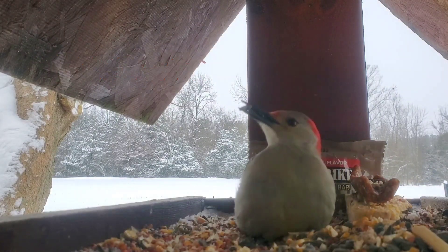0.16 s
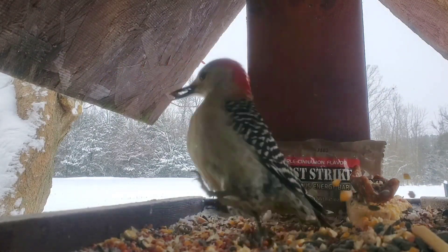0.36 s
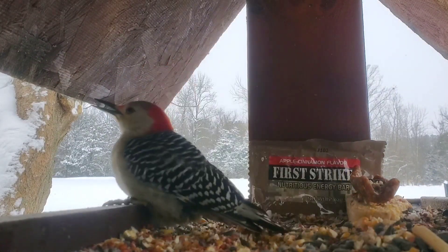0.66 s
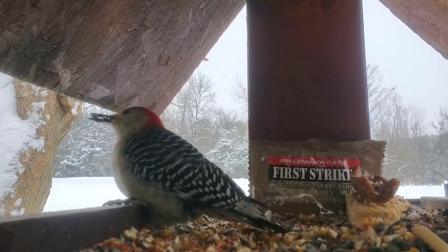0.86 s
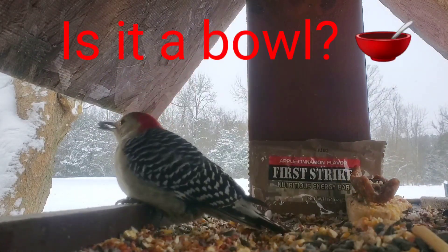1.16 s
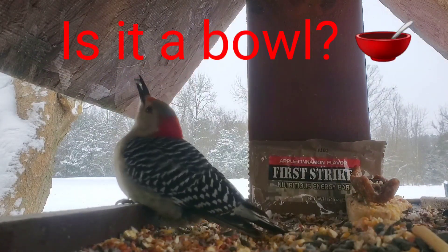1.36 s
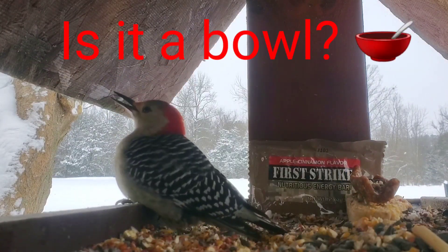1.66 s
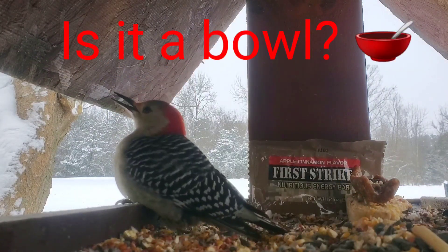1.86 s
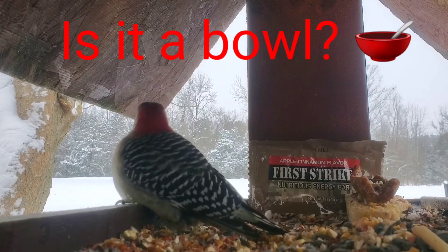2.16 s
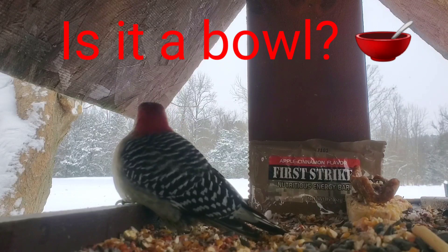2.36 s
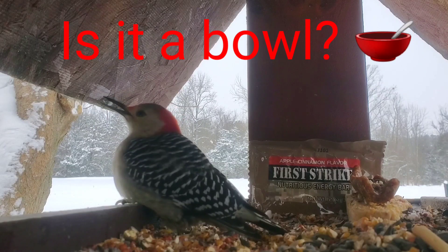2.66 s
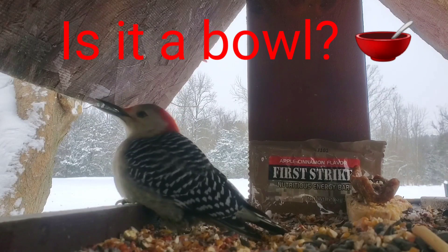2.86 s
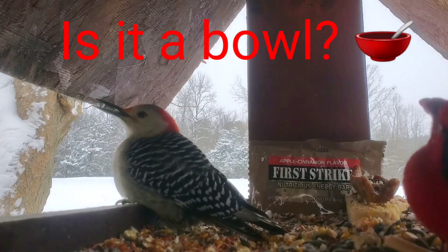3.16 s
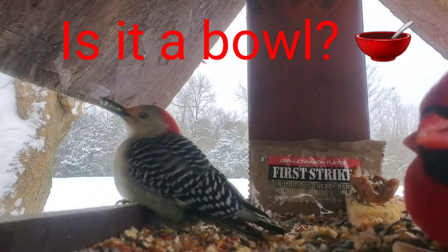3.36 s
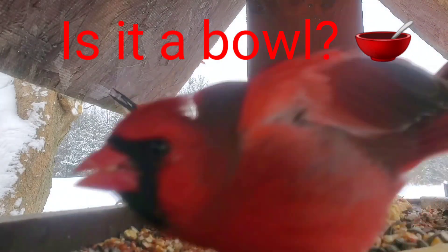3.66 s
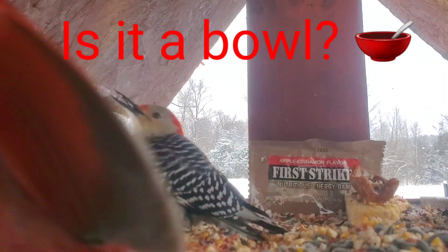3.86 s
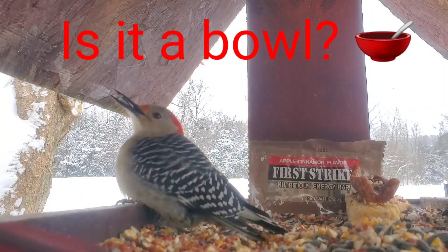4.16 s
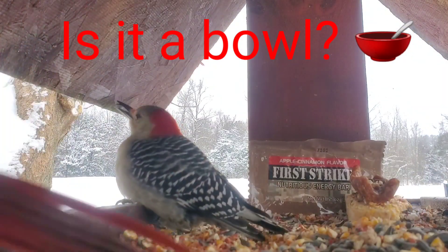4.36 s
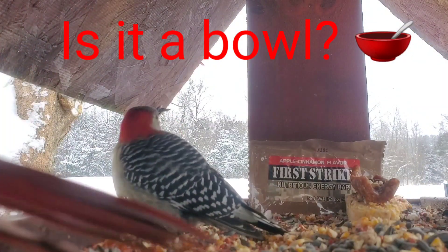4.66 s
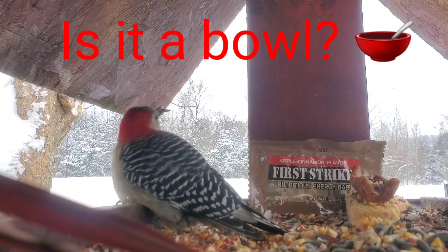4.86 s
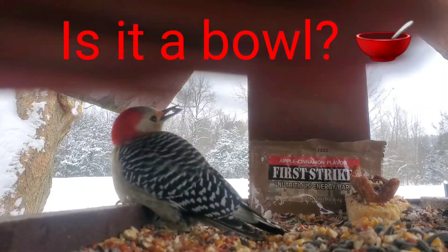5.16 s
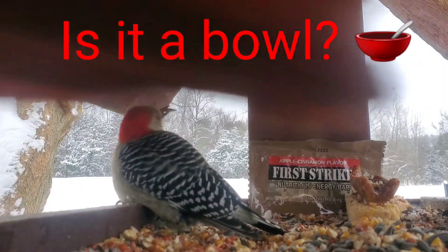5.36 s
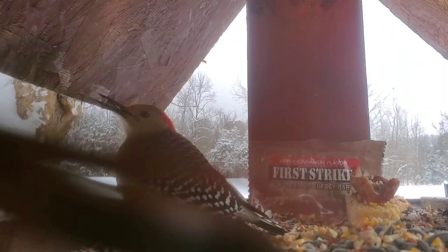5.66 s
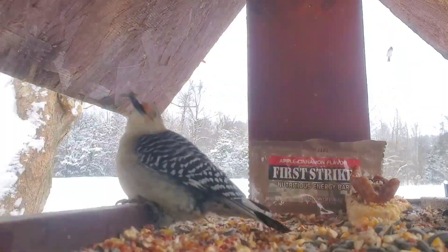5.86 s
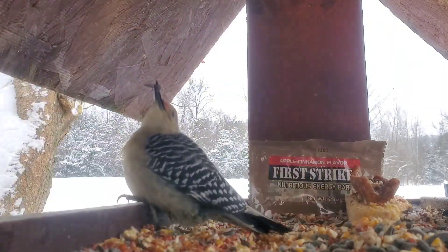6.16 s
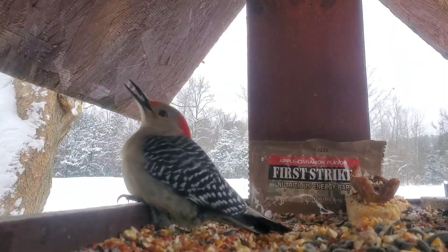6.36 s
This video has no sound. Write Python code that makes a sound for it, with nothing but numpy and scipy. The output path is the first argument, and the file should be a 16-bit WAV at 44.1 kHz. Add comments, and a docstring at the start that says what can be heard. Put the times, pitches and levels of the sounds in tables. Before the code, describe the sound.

Birds shuffle on a wooden feeder tray right against the microphone: feather swishes, small knocks, seed clicks, low throbbing buffets and two brief stuttering foot squeaks.

```python
"""On a wooden feeder tray, on a still winter day, birds shuffle about right against a small camera.
Sliding barbs swish by friction over the case; pressed air buffets the microphone ports in throbbing pushes.
Bumps, clicks and knocks are brief contact forces; struck or scraped, the case rings in its modes.
Twice a foot skids by stick and slip, with a rough, stuttering squeak; faint air and hiss lie behind."""
import sys
import numpy as np
from scipy import signal
from scipy.fft import rfft, irfft
from scipy.io import wavfile
from scipy.ndimage import uniform_filter1d

SR = 44100
rng = np.random.default_rng(int(sys.argv[2]) if len(sys.argv) > 2 else 0)


def wav_record(signal):
    """Record a signal, one row per channel, as 16-bit PCM in the file named by sys.argv[1]."""
    frames = np.transpose(np.atleast_2d(signal))
    bounded = np.clip(frames, -1, 1)
    # unit amplitude maps onto the largest positive 16-bit level
    quanta = np.round(bounded * 32767).astype(np.int16)
    wavfile.write(sys.argv[1], SR, quanta)


N = 287520
TIME = np.arange(N) / SR

# feathers sliding past: start_s, length_s, crest [share of length], level_db, low_edge_hz,
# fizz_over_swish_db, hollow_over_level_db, left_minus_right_db
SWISHES = [(0.0, 0.028, 0.21, -47, 1700, -11, -1, 7), (0.252, 0.18, .9, -61, 1850, -4, 6.5, 3.5),
           (0.382, 0.18, .6, -50, 1800, 6, -3, 2), (0.532, 0.095, .35, -48.5, 1720, -3, 3, 4),
           (0.784, 0.21, .6, -65, 1760, -51, 10.5, 4.5), (0.939, 0.25, .7, -54, 1940, -8, 0, 2.5),
           (1.202, 0.17, .45, -49, 1980, -18, 3.5, 3), (1.412, 0.15, .45, -60, 1320, -8, 12.5, 2),
           (1.61, 0.15, .6, -69.5, 2000, 2, 5.5, 7), (1.752, 0.11, .5, -61.5, 2120, 5, 2.5, 6),
           (1.955, 0.28, .45, -56.5, 1860, 3, 4, 3), (2.304, 0.26, .5, -54.5, 1850, 0.5, -2, 2.5),
           (2.554, 0.18, .7, -46.5, 1850, -4.5, -6, 1.5), (2.742, 0.07, .6, -44.5, 1670, 0, -0.5, 5),
           (2.819, 0.1, .4, -32.5, 2060, -4.5, -5, 0), (2.906, 0.27, 0.064, -52.5, 2000, -7, -3, 1.5),
           (3.153, 0.068, 0.31, -33.5, 1875, 0, -9.5, 2), (3.417, 0.031, .5, -37, 2000, 3.5, -18.5, 2.5),
           (3.464, 0.081, .8, -46, 2600, 0.5, -6.5, 2.5), (3.599, 0.14, .9, -38.5, 1730, -4, -16.5, 2.5),
           (3.743, 0.088, .3, -32.5, 1818, 5, -2, 5), (3.855, 0.18, .35, -36, 2150, 3, -6.5, 3),
           (4.028, 0.044, .75, -30.5, 1935, -3, -1, 9), (4.09, 0.13, .4, -50, 1820, -7, -6.5, 5),
           (4.408, 0.1, .8, -55.5, 2100, 3, -9, 7.5), (4.556, 0.057, .8, -63, 2320, 11, -6, 10),
           (5.155, 0.15, .65, -61.5, 2000, 4, 0.5, 8), (5.497, 0.19, .4, -64.5, 2940, -1, -4.5, 10.5),
           (5.786, 0.27, .8, -65, 2000, 3, 2.5, 7), (5.99, 0.23, .35, -59, 2200, -2, 2.5, 2.5),
           (6.272, 0.17, .3, -76.5, 1680, -4, 19, 2)]
# a movement starts quickly, arches to its crest and dies away: attack_s, ends_below_crest_db, release_s
SWISH_SHAPE = (0.021, 12.5, .02)
PUSH_SHAPE = (0.048, 9, 0.015)  # same columns
# a bird pressing air onto the ports: start_s, length_s, crest [share of length],
# level_db [before the throb], left_minus_right_db
PUSHES = [(0.005, 0.061, .5, -68, -9), (0.252, 0.14, .8, -58.5, -30), (0.412, .21, .3, -80.5, 6),
          (0.773, 0.64, 1, -46, 0), (1.427, 0.16, 0.6, -48.5, 0.5), (1.633, 0.23, .865, -50, 1.5),
          (1.953, 0.26, 0.65, -39, 2.5), (2.316, 0.2, 0.61, -32, 5), (2.551, 0.15, 0.84, -20.5, 6.5),
          (2.706, 0.26, .6, -43.5, 9.5), (3.258, 0.047, .6, -40, 7), (3.394, 0.18, .5, -65.5, 1),
          (3.694, 0.12, .5, -38.5, 13), (3.846, 0.23, .35, -31, 3.5), (4.028, 0.27, .1, -41.5, 3),
          (4.296, 0.086, 1, -46, -12), (4.75, 0.31, .3, -68, -1), (5.231, 0.043, 0.72, -30, 24.5),
          (5.499, 0.29, .5, -55, 2), (5.981, 0.26, .4, -49.5, 4), (6.172, 0.03, .6, -30.5, -26),
          (6.283, 0.25, .6, -51.5, -4)]
# faint fidgeting between movements, with one still moment: time_s, level_db
FIDGET = [(0, -72), (1.2, -72.5), (1.9, -76), (2.9, -69), (4.3, -65.5), (4.72, -82.5), (5.0, -85),
          (5.12, -75.5), (5.4, -78), (6.5, -73)]
# soft bumps of a bird's body: time_s, relative_level_db
BUMPS = [(0.922, -39), (0.955, -33.5), (1.047, -40), (1.3, -31), (1.347, -36), (1.457, -36), (1.51, -31.5),
         (1.693, -35), (1.816, -30.5), (2.004, -29), (2.061, -29.5), (2.117, -30), (2.184, -27),
         (2.376, -27.5), (2.437, -28), (2.622, -26.5), (2.656, -27), (2.672, -28.5), (3.734, -41.5),
         (3.912, -20), (3.973, -22.5), (4.022, -31), (4.139, -56), (4.214, -49), (5.688, -48),
         (6.064, -35.5), (6.108, -43), (6.163, -47), (6.341, -43.5), (6.387, -38.5), (6.427, -45),
         (6.47, -41.5)]
# claws and bills on seed, wood and case: start_s, level_db, contact_s,
# brightness_db [3.5 above the tilt applied from 8 kHz up], left_minus_right_db
CLICKS = [(0.0208, -37.5, 0.0028, -2.5, 1), (0.2372, -44.5, 0.0032, 3.5, 6), (0.269, -46.5, 0.0026, 5, -3),
          (0.475, -35.5, 0.0018, 24, 1), (0.498, -34.5, 0.001, 31, 7), (0.5595, -33, 0.0014, -6.5, 0),
          (0.5753, -32, 0.0014, 21, 1), (0.5997, -42, 0.0057, 11, 1), (0.9517, -45, 0.0029, -12, 2),
          (1.4659, -48, .0024, 12, 11), (1.4794, -46, 0.0074, -4.5, 4), (2.039, -49, 0.0066, -22, 5),
          (2.335, -41, 0.0041, 12, 5), (2.383, -33, 0.0069, -3, 2), (2.4417, -39, 0.011, -3.5, 4.5),
          (2.739, -39.5, 0.011, -8.5, 5), (2.777, -34.5, 0.0031, -11.5, 1), (3.0012, -40, 0.0033, -17, 5.5),
          (3.021, -34, 0.0032, -2, -3), (3.0894, -37.5, 0.002, -16, -7), (3.26, -40, 0.0072, -5.5, 5.5),
          (3.2818, -24.5, 0.0028, 7, 11), (3.315, -41.5, 0.0036, -12, 3.5),
          (3.6486, -41.5, 0.0012, -9, 19.5), (3.759, -26, .0069, 0.5, 4.5),
          (3.7879, -24, 0.0046, -10, 17.5), (3.8555, -31, .0039, -11.5, -1.5),
          (3.8723, -25, 0.0075, -2, 2.5), (3.918, -23, 0.0032, 0.5, 1), (3.945, -28.5, .0063, 19.5, 22),
          (3.9882, -27, 0.0042, 14.5, 5.5), (4.0197, -25.5, .005, 10, 13.5),
          (4.0343, -23.5, .0027, 12, 6.5), (4.0573, -26.5, 0.0059, -5.5, 10.5),
          (4.0914, -26, 0.0026, 21, 7.5), (4.1069, -38.5, 0.0012, 10, 12),
          (4.1223, -40.5, 0.0047, 10.5, 17.5), (4.181, -35, .0017, 8.5, 11.5),
          (4.2008, -30.5, 0.0044, -5.5, 7.5), (4.2458, -53.5, 0.0065, -8, 6), (4.3481, -45, 0.0012, 3, 13),
          (5.0426, -55, .0014, 9.5, 11), (5.216, -48, 0.0014, 5, 16), (5.2534, -47, 0.015, -3, 8),
          (5.8015, -54.5, 0.0029, 19, 14)]
# feet knocking on the case: start_s, level_db, nominal_hz [the ring sags from 0.99 to 0.86 of it]
KNOCKS = [(0.02, -37, 624), (0.213, -40, 630), (0.278, -48.5, 590), (0.318, -44.5, 610), (0.437, -42, 650),
          (0.551, -32, 670), (0.567, -37, 765), (1.097, -38, 925), (1.208, -43.5, 635), (1.449, -34.5, 970),
          (2.385, -34, 690), (2.774, -32, 710), (3.281, -38.5, 859), (3.317, -64, 790), (3.763, -27.5, 746),
          (3.789, -21.5, 793), (3.817, -26.5, 660), (3.855, -28, 657), (4.02, -36, 820), (4.063, -30, 800),
          (4.154, -36.5, 654), (4.201, -34, 753), (4.347, -44.5, 1030), (4.493, -34.5, 626),
          (5.252, -44.5, 695), (5.9, -54, 740), (6.005, -44.5, 690), (6.036, -40.5, 824)]
# the two skids of a foot, a curve each: time_s, relative_force_db, squeak_hz
SKID_CURVES = [
    [(2.813, -31.5, 800.4), (2.835, -32.5, 734.2), (2.845, -30.5, 738), (2.917, -35, 811),
     (2.951, -27, 832.6), (2.987, -37.5, 822.6), (3.02, -31, 820)],
    [(3.42, -32.5, 672), (3.534, -29, 681), (3.54, -34, 692)],
]
# short catches of the foot before and after a skid: time_s, force_db, squeak_hz
CATCHES = [(3.039, -33.5, 816.6), (3.05, -33, 649), (3.075, -38.5, 692), (3.09, -38, 780),
           (3.105, -43.5, 600), (3.401, -38.5, 718.8), (3.55, -32, 656.6), (3.567, -32, 666.4),
           (3.588, -36, 695)]
# upper modes of the case: frequency_hz, bandwidth_hz, relative_level_db
CASE_MODES = [(1040, 180, 12), (1164, 230, -1), (1860, 570, -10), (1975, 75, 8.5), (2124, 83, 6),
              (2495, 260, 2), (2880, 210, -13.5), (2700, 160, 0), (2990, 450, 1), (3486, 120, -6),
              (4700, 1400, -11.5)]

# relative spectra: frequency_hz, level_db
FEATHER_SPECTRUM = [(240, -34), (400, -10.5), (630, -4), (734, -4), (816, 13.5), (1390, 2.5), (1820, -4.5),
                    (2320, -5.5), (3290, -9), (4810, -15), (5430, -13.5), (7470, -9.5), (10100, -9),
                    (12300, -4), (15000, -5.5)]  # barbs sliding
HOLLOW_SPECTRUM = [(250, -1.5), (450, -5.0), (580, 2.5), (750, -1.5), (1080, -3.5), (1350, -19.5), (2000, -31.5)]
HEAVY_PUSH_SPECTRUM = [(11, -47), (18, -14), (43, -2), (58, 8.5), (70, -3), (85, -10), (113, -9.5),
                       (147, -20.5), (206, -12.5), (252, -18), (315, -34), (410, -24), (481, -44.5),
                       (600, -35.5), (780, -60), (1320, -120)]  # heavy pressure on the ports
LIGHT_PUSH_SPECTRUM = [(11, -38), (18, -17), (43, 5.5), (60, 11.5), (97, 2), (140, -2.5), (200, -2.5),
                       (265, -8), (320, -17.5), (420, -17.5), (600, -37.5), (800, -43.5), (1300, -96.5)]  # light brushing of the ports
CLICK_SPECTRUM = [(300, -6.5), (700, 2), (1400, -0.5), (2200, -3), (3500, 3), (5500, -0.5), (8000, 4),
                  (12000, 5), (15000, 6)]  # scratch of one contact
SKID_SPECTRUM = [(300, -14), (560, 5.5), (650, 0), (740, -7.5), (850, 3), (1000, 4), (1500, -12.5),
                 (2000, -8), (5000, -8)]  # squeaking tone
GRIT_SPECTRUM = [(500, -36), (900, 2.5), (2000, -26), (3500, 15.5), (5500, 11.5), (8000, 9), (11000, 8),
                 (15000, -13)]  # fine cracks under the foot
HUSH_SPECTRUM = [(12, -38.5), (20, -12), (45, -9), (66, -4), (82, -3), (135, -26), (278, -20), (377, -19.5),
                 (713, -22), (1080, -34), (1460, -31.5), (3010, -33.5), (6180, -38.5), (13800, -35.5),
                 (15000, -53.5)]  # open air and microphone hiss
BASS_ROLLOFF = [(10, -19), (25, -2.5), (42, -1)]
TREBLE_ROLLOFF = [(14600, 0), (15000, -14), (15600, -27), (16300, -33)]


def feathers(grain_db=-1.5, flutter_db=2.0, snaps_per_s=260, snap_db=-9, patch_db=3.0):
    """Dry friction: barbs slide and catch in a grainy swish over the hollow resonance of the case."""
    catch = amp(grain_db * wander(420) + flutter_db * wander(28))
    snap_sizes = amp(4.9 * np.minimum(rng.exponential(1, (2, N)), 3))
    snaps = (rng.random((2, N)) < snaps_per_s / SR) * snap_sizes * rng.choice([-1, 1], (2, N))
    barbs = colour(unit(pair(0) * catch) + amp(snap_db) * unit(snaps), FEATHER_SPECTRUM)
    fizz = unit(band(barbs, 4600, 14000))
    hollow = unit(colour(pair(0.35) * catch, HOLLOW_SPECTRUM))

    fidget_swish = amp(-7.5) * unit(band(barbs, 1900, 6000))
    out = amp(curves(FIDGET)[0]) * (fizz + fidget_swish + amp(1.5) * hollow)
    for start, length, crest, db, low_hz, fizz_db, hollow_db, side in SWISHES:
        gain = stroke(start, length, crest, *SWISH_SHAPE)
        span = np.flatnonzero(gain)
        swish_share = 1 / (1 + amp(fizz_db) ** 2)  # of the power
        swish = unit(band(barbs[:, span], low_hz, 5500, order=8)) * np.sqrt(swish_share)
        swish += fizz[:, span] * np.sqrt(1 - swish_share)
        out[:, span] += (swish + amp(hollow_db) * hollow[:, span]) * gain[span] * amp(db) * pan(side)
    return shaded(out, patch_db)


def shaded(x, patch_db):
    """Shifting transmission: narrow gaps open and close between feathers, so bands come and go."""
    hz, t, z = signal.stft(x, SR, nperseg=512, noverlap=384)
    patches = uniform_filter1d(rng.standard_normal((len(t), len(hz))), size=36, axis=0)
    patches = uniform_filter1d(patches, size=4, axis=1)
    gains = unit(amp(patch_db * unit(patches).T))
    return signal.istft(z * gains, SR, nperseg=512, noverlap=384)[1][:, :N]


def stroke(start, length, crest, attack_s, arch_db, release_s):
    """Envelope of one movement: a linear attack, an arch in dB through the crest, an exponential release."""
    gain = np.zeros(N)
    span = slice(max(int(start * SR), 0), int((start + length + 8 * release_s) * SR))
    t = TIME[span] - start
    crest = np.clip(crest, 0.05, 0.95)
    from_crest = np.interp(t / length, [0, crest, 1], [-1, 0, 1])
    attack = np.clip(t / attack_s, 0, 1)
    release = np.exp(-np.maximum(t - length, 0) / release_s)
    gain[span] = attack * amp(-arch_db * from_crest ** 2) * release
    return gain


def buffeting(level, side, likeness=0.94, steadiness=0.8, heavy_db=-36):
    """Pressure on the ports: light brushing flutters up to 300 Hz, a heavy push sways the case near 60 Hz."""
    heavy_share = 1 / (1 + amp(14.0 * (heavy_db - level)))
    heavy = unit(colour(pair(likeness), HEAVY_PUSH_SPECTRUM))
    light = unit(colour(pair(likeness), LIGHT_PUSH_SPECTRUM))
    push = heavy * np.sqrt(heavy_share) + light * np.sqrt(1 - heavy_share)
    # dividing by the smoothed strength evens out most of the chance swells
    strength = uniform_filter1d(np.mean(push ** 2, 0), size=1100)
    strength = uniform_filter1d(strength, size=500) + 1e-6
    return unit(push / strength ** (steadiness / 2)) * amp(level) * pan(side)


def pressure(throb_hz=20, throb_db=2.5, fidget_push_db=5):
    """Superposed powers of throbbing pushes and fidgeting give the level and side (both dB) at the ports."""
    power = np.ones((2, 1)) * amp(curves(FIDGET)[0] + fidget_push_db) ** 2
    for start, length, crest, db, side in PUSHES:
        gain = stroke(start, length, crest, *PUSH_SHAPE)
        span = np.flatnonzero(gain)
        # a pushing bird also shakes, in step with the crest of its push
        throb = np.cos(2 * np.pi * throb_hz * (TIME[span] - start - crest * length))
        power[:, span] += (amp(db + throb_db * throb) * gain[span] * pan(side)) ** 2
    return 10 * np.log10(power.mean(0)), 10 * np.log10(power[0] / power[1])


def bumps(side, light_s=0.0012, heavy_s=0.0018, after_hz=60, after_s=0.011, gain_db=1.5,
          thud_hz=230, thud_s=0.0035, thud_db=-11):
    """Impulse and recoil: a push, a dull thud and a low swing back where the bird leans; heavy ones last longer."""
    out = np.zeros((2, N))
    t = np.arange(-SR // 80, SR // 12) / SR
    since = np.maximum(t, 0)
    swing = 0.13 * np.sin(2 * np.pi * after_hz * since) * np.exp(-since / after_s)
    thud = amp(thud_db) * np.sin(2 * np.pi * thud_hz * since) * np.exp(-since / thud_s)
    for s, db in BUMPS:
        u = t / np.interp(db, [-36, -22], [light_s, heavy_s])
        push = (1 - 0.38 * u ** 2) * np.exp(-u ** 2 / 2)
        add(out, s + t[0], amp(db + gain_db) * (push - swing - thud))
    return out * pan(side)


def clicks(tail_db=-19, scatter_s=0.016, ring_db=-10):
    """Brief contact: each tiny scratch is a burst of crackle with a short scatter off the tray."""
    out = np.zeros((2, N))
    t = np.arange(2048) / SR
    for s, db, contact_s, bright, side in CLICKS:
        u = t / contact_s
        scatter = amp(tail_db) * np.exp(-t / scatter_s) * np.minimum(u, 1)
        shape = 2.24 * u * np.exp(1 - 2.1 * u) + scatter
        crackle = colour(pair(0, size=len(t)), CLICK_SPECTRUM)
        crackle = colour(crackle, [(3500, 0.0037), (8000, bright - 3.5)])
        add(out, s, amp(db) * pan(side) * unit(crackle * shape) * np.sqrt(np.mean(shape ** 2)))
    return out + amp(ring_db) * case(out)


def knocks(rise_s=0.00022, decay_s=0.0053, clack_db=-13, clack_s=0.0046):
    """A loaded resonator: the foot sets the pitch of the main mode, under a brief clack of upper modes."""
    main, blow = np.zeros((2, N)), np.zeros((2, N))
    t = np.arange(SR // 12) / SR
    shape = (1 - np.exp(-t / rise_s)) ** 2 * np.exp(-t / decay_s)
    shape /= shape.max()
    for s, db, hz in KNOCKS:
        # the pitch sags as the pressure of the blow eases
        turns = hz * (0.86 * t + 0.0008 * (1 - np.exp(-t / 0.0063)))
        add(main, s, amp(db) * shape * np.sin(2 * np.pi * turns))
        add(blow, s + 0.001, amp(db + clack_db) * np.exp(-t / clack_s) * pair(0, size=len(t)))
    return main * pan(4.5) + case(blow)


def skids(jitter=0.097, chatter_db=-11, upper_db=-9, edge_db=-18, rasp_db=-7, rasp_growth=0.22,
          grit_db=-15, grit_growth=5):
    """Stick and slip: slips swell the main mode; a higher pitch stands for a firmer, more rasping grip."""
    force, hz = slipping()
    grip = np.minimum(hz / 720, 1.12)
    phase = 2 * np.pi * np.cumsum(hz * (1 + jitter * wander(330))) / SR
    tone = np.sqrt(2) * (np.sin(phase) + amp(edge_db) * np.sin(3 * phase)) * amp(wander(250))
    # the rest of the case chatters around the squeak; a firm grip damps the upper chatter
    chatter = amp(chatter_db) * unit(band(pair(0.79), 670, 790, order=12))
    upper = amp(upper_db) * unit(band(pair(0.17), 750, 1200, order=12)) / grip ** 2
    low_cut = signal.butter(N=14, Wn=550, btype="high", fs=SR, output="sos")
    squeak = signal.sosfilt(low_cut, (colour(tone, SKID_SPECTRUM) + chatter + upper) * force)
    # the foot breaks loose once a cycle, with a tiny crack
    breaking = 0.17 + np.exp(3 * (np.cos(phase) - 1))
    cracks = unit(pair(0.034) * breaking * amp(0.22 * wander(150)))
    rasp = signal.sosfilt(low_cut, case(cracks * force * grip ** rasp_growth)) * amp(rasp_db)
    grit = unit(colour(cracks, GRIT_SPECTRUM)) * force * grip ** grit_growth * amp(grit_db)
    return squeak * pan(1.3) + (rasp + grit) * pan(0.72)


def slipping(rise_s=0.0038, fall_s=0.0051):
    """Dominance of the strongest slip sets the force of a skid; power weighting glides its pitch between slips."""
    s, db, hz = slips().T
    span = (TIME > s.min() - 0.03) & (TIME < s.max() + 0.05)
    t = TIME[span] - s[:, None]
    shape = np.where(t < 0, np.exp(-(t / rise_s) ** 4 / 2), 1 / np.cosh(t / fall_s))
    swells = amp(db)[:, None] * shape
    weights = swells ** 2 + 1e-18
    force, pitch = np.zeros(N), np.full(N, hz[0])
    force[span] = swells.max(0)
    pitch[span] = hz @ weights / weights.sum(0)
    return force, pitch


def slips(count=48, per_s=78, timing=0.12, spread_db=1.8, peak_db=5):
    """Relaxation at a nearly even rate: rows of time_s, force_db, squeak_hz, each slip a little different."""
    rows = [np.array(CATCHES)]
    for skid in SKID_CURVES:
        s, db, hz = np.transpose(skid)
        shift, stronger = rng.standard_normal((count, 2)).T
        at = s[0] + (np.arange(count) + timing * shift) / per_s
        force_db = np.interp(at, s, db) + peak_db + spread_db * stronger
        skid_rows = np.transpose([at, force_db, np.interp(at, s, hz)])
        rows.append(skid_rows[at < s[-1]])
    return np.vstack(rows)


def case(x):
    """Modal resonance: the upper modes of the case ring with whatever scrapes or strikes it."""
    t = np.arange(SR // 30) / SR
    ring = np.zeros(len(t))
    for hz, width_hz, db in CASE_MODES:
        decay = np.exp(-np.pi * width_hz * t)
        ring += amp(db) * np.sqrt(width_hz) * decay * np.sin(2 * np.pi * hz * t)
    return signal.oaconvolve(x, ring[None] / np.linalg.norm(ring), axes=1)[:, :N]


def ports(x, hz=1020, sharpness=2.4):
    """Opposed phase: near 1 kHz the case rocks from side to side, so the two ports move against each other."""
    b, a = signal.iirpeak(hz, sharpness, fs=SR)
    return np.array([x[0], x[1] - 2 * signal.lfilter(b, a, x[1])])


def hush(level_db=-75.5):
    """Stationary noise: faint open air and microphone hiss."""
    return unit(colour(pair(0.1), HUSH_SPECTRUM)) * amp(level_db)


def amp(db):
    """Decibel law: amplitude ratio of a level."""
    return 10 ** (np.asarray(db) / 20)


def unit(x):
    """Normalisation to an rms of 1."""
    return x / np.sqrt(np.mean(x ** 2) + 1e-20)


def curves(rows):
    """Linear interpolation of each column after the first over the samples."""
    s, *columns = np.transpose(rows)
    return [np.interp(TIME, s, c) for c in columns]


def pan(db):
    """Constant power: left and right gains for a left-minus-right level."""
    g = amp(np.array([[0.5], [-0.5]]) * db)
    return g / np.sqrt(np.mean(g ** 2, 0))


def add(mix, s, sound):
    """Superposition of a sound onto the mix from a given second."""
    part = mix[:, max(round(s * SR), 0):][:, :sound.shape[-1]]
    part += sound[..., :part.shape[1]]


def colour(x, points):
    """Linear filtering by a spectrum of frequency_hz, level_db points."""
    hz, db = np.transpose(points)
    f = np.fft.rfftfreq(x.shape[-1], 1 / SR)
    return irfft(rfft(x) * amp(np.interp(np.log(f + 1), np.log(hz + 1), db)), x.shape[-1])


def band(x, lo_hz, hi_hz, order=6):
    """Band-pass filtering with smooth edges."""
    f = np.fft.rfftfreq(x.shape[-1], 1 / SR) + 1
    loss = np.sqrt((1 + (lo_hz / f) ** order) * (1 + (f / hi_hz) ** order))
    return irfft(rfft(x) / loss, x.shape[-1])


def wander(hz):
    """Band-limited chance: a smooth random curve of rms 1, up to a rate."""
    return unit(band(rng.standard_normal(N), hz / 20, hz))


def pair(likeness, size=N):
    """Partial coherence: noise at the two ports, partly shared."""
    a, b = rng.standard_normal((2, size))
    c = np.clip(likeness, -1, 1)
    return np.array([a, c * a + np.sqrt(1 - c * c) * b])


def scene():
    """Superposition of everything that touches the case, over the quiet outdoors."""
    level, side = pressure()
    touching = ports(feathers() + clicks() + knocks() + skids())
    return touching + buffeting(level, side) + bumps(side) + hush()


def record(dry):
    """Band limitation: the microphone rolls off in the deepest bass and steeply at the top."""
    body = colour(dry, BASS_ROLLOFF)
    top = colour(body, TREBLE_ROLLOFF)
    low_pass = signal.firwin(511, 16400, window=("kaiser", 9), fs=SR)
    return signal.oaconvolve(top, low_pass[None], "same")


dry = scene()
out = record(dry)
wav_record(out)
```